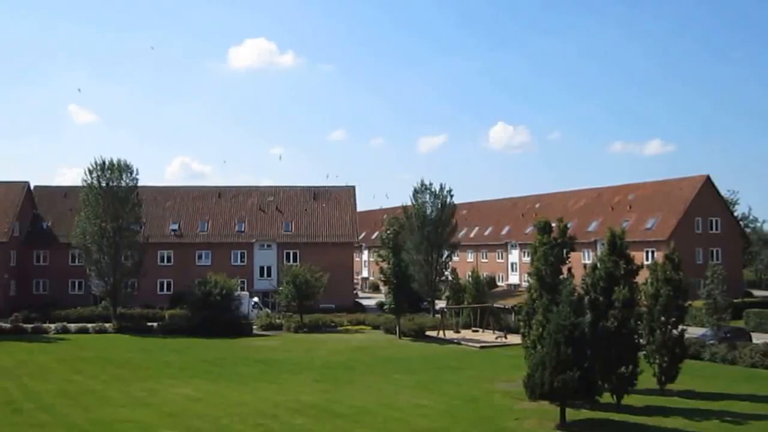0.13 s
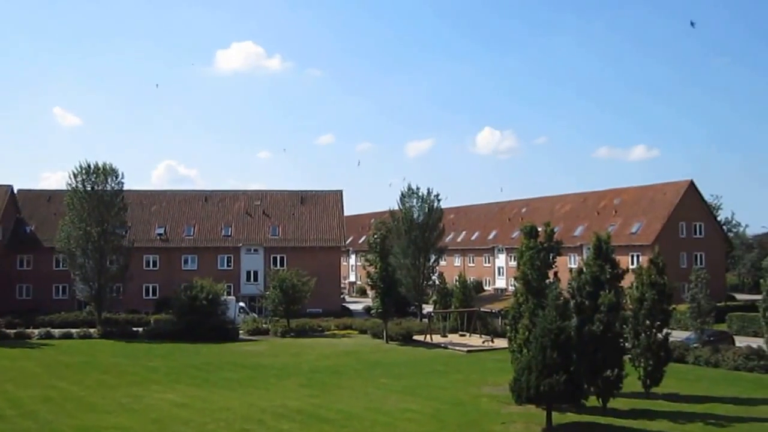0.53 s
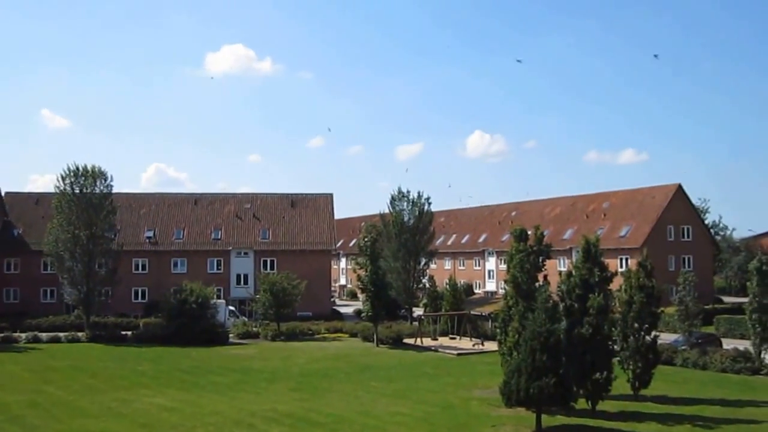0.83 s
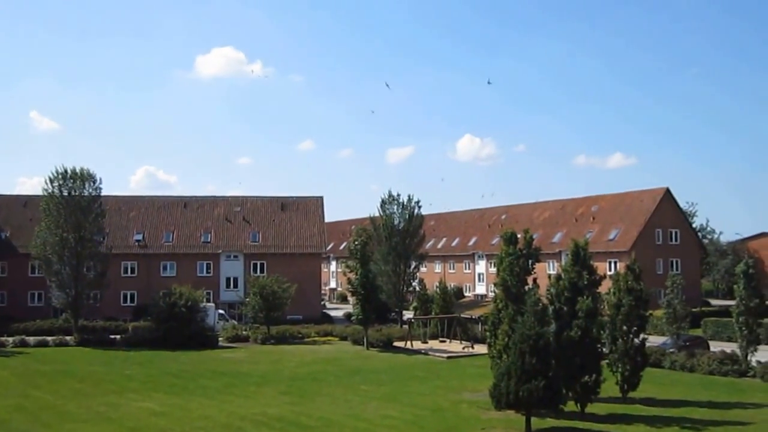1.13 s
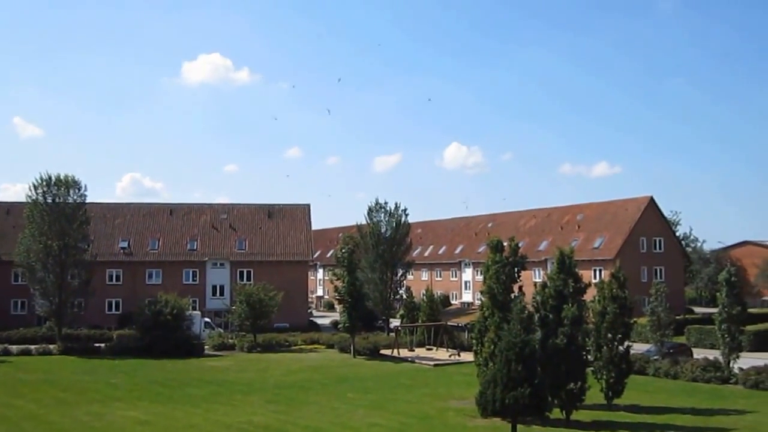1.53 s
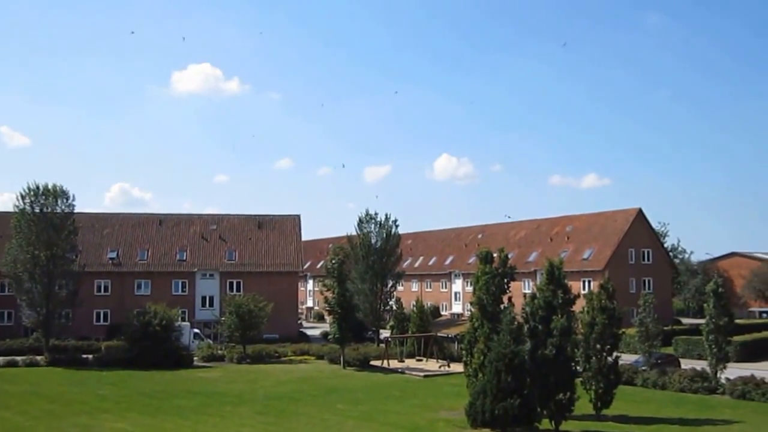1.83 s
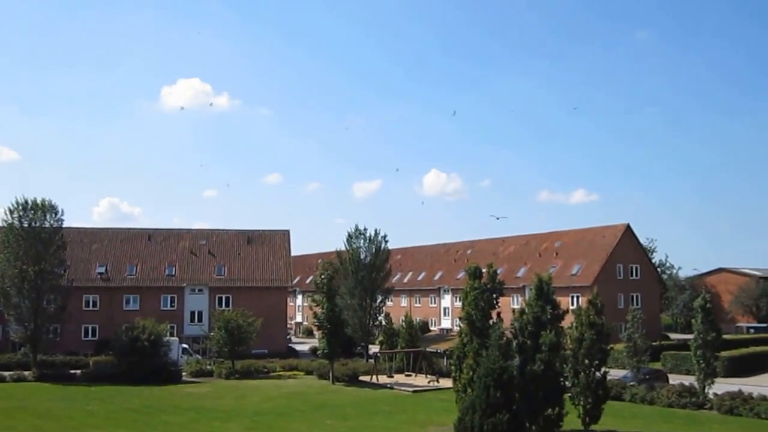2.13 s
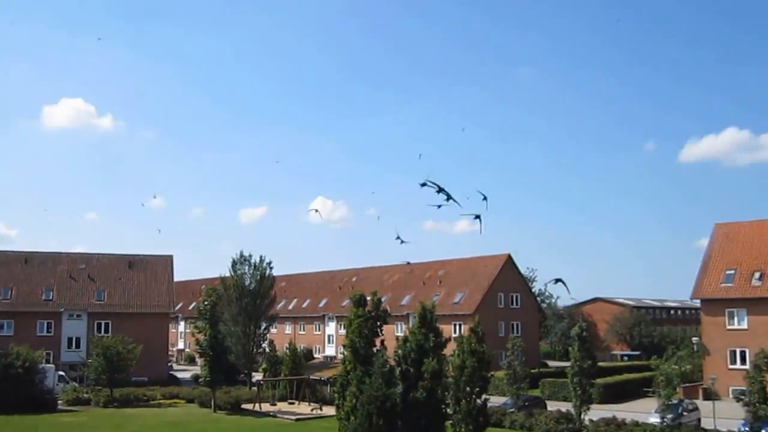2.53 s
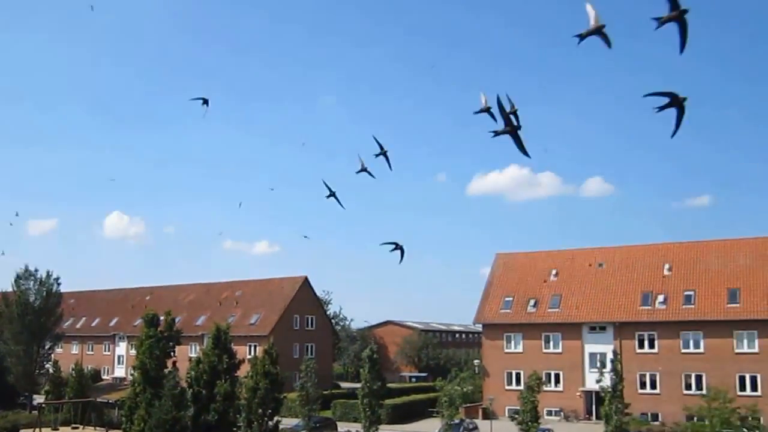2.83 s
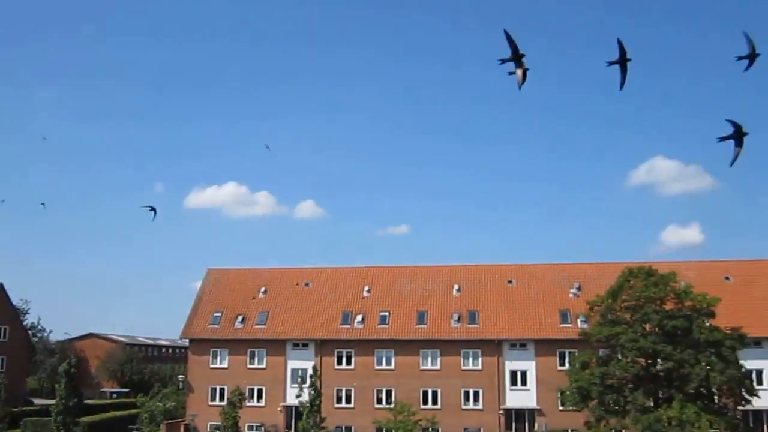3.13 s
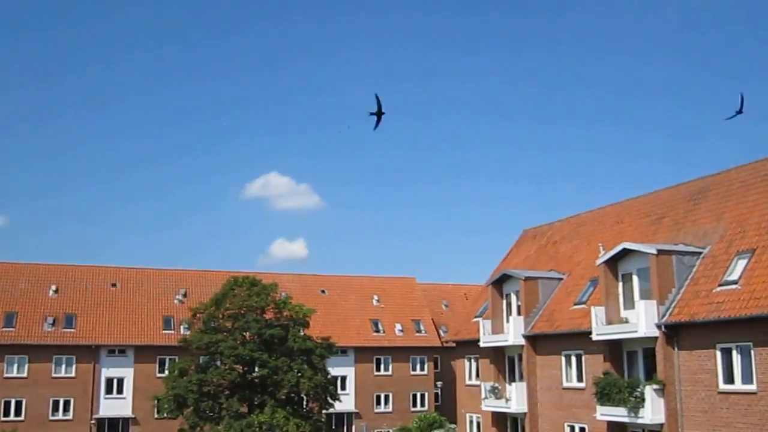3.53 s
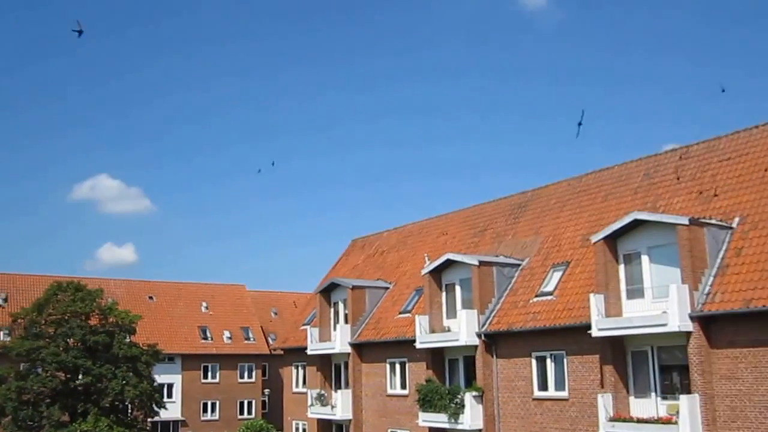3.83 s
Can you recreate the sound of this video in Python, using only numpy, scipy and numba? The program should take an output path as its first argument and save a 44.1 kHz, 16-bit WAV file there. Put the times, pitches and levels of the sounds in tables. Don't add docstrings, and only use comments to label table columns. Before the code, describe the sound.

A flock of swifts screams, thin and distant at first, then piercing as it sweeps overhead around 2.5 to 3 seconds, then fading; far traffic and wind thumps on a small outdoor camera microphone.

```python
import sys
import numpy as np
from scipy import signal
from scipy.fft import rfft, irfft
from scipy.io import wavfile
from scipy.ndimage import uniform_filter1d
from numba import njit

SR = 44100
rng = np.random.default_rng(int(sys.argv[2]) if len(sys.argv) > 2 else 0)


def makeup_ratio(level_db):
    decades = np.asarray(level_db, float) / 20
    return 10 ** decades


def materialize(psi):
    bounded = np.clip(np.atleast_2d(psi).T, -1, 1)
    quanta = np.round(bounded * 32767).astype(np.int16)
    wavfile.write(sys.argv[1], SR, quanta)


N = 176400
T = np.arange(N) / SR

# (frequency [Hz], level [dB per Hz])
TOWN_SPECTRUM = [(35, -26), (60, 7), (135, -11.5), (263, -7), (380, -13), (690, -7.5), (780, -8),
                 (1210, -5.5), (4000, -28.5), (5200, -58), (8800, -120)]
# (frequency [Hz], width [Hz], level [dB])
CAR_HUM = [
    (683, 18, -50.5),
    (1175, 79, -50),
]
# (time [s], level [dB])
GUSTS = [(.04, -51.5), (.5, -45), (.8, -35), (1.25, -24.5), (1.33, -27), (1.44, -21), (1.65, -30),
         (1.73, -38), (1.95, -25.5), (2.12, -37), (2.251, -24.5), (2.55, -31.5), (2.75, -33), (2.92, -51),
         (3.34, -36), (3.54, -37.5), (3.62, -27), (4, -32.5)]
# (time [s], peak level [dB])
WIND_THUMPS = [(0.689, -26), (1.009, -23.5), (1.16, -13.5), (1.271, -24.5), (1.408, -13), (1.436, -6.5),
               (1.479, -19), (1.53, -18), (1.645, -29), (1.763, -28.5), (1.953, -19), (2.224, -16),
               (2.27, -13), (2.379, -16), (2.749, -17), (3.61, -4), (3.649, -14), (3.696, -12.5),
               (3.714, -23), (3.783, -19), (3.801, -11.5), (3.835, -14), (3.959, -19.5), (3.997, -11.5)]
# (first chip [s], last chip [s], first pitch [Hz], gap [s], level [dB])
TRILL_RUNS = [(0.043, .075, 5880, 0.028, -41.5), (0.358, 0.49, 5900, 0.011, -40.5),
              (0.967, 1.06, 6000, 0.011, -34.5), (1.831, 1.913, 6050, 0.015, -23),
              (2.232, 2.32, 5630, 0.014, -25), (2.403, 2.475, 6470, 0.012, -19),
              (2.763, 2.86, 6200, 0.026, -15.5), (2.783, 2.86, 4540, 0.029, -25),
              (3.2, 3.015, 5950, .025, -18.5), (3.18, 3.234, 5060, 0.011, -29.5),
              (3.1, 4, 5880, 0.013, -30.5), (3.789, 3.865, 3870, .014, -41.5),
              (2.478, 2.504, 4500, 0.014, -33.5), (3.046, 3.087, 4270, .037, -30),
              (2.336, 2.34, 4440, 0.019, -30), (0.451, 0.452, 5070, 0.028, -39),
              (3.647, 3.68, 4200, 0.013, -39.5), (3.394, 3.455, 4050, 0.033, -40),
              (3.146, 3.147, 4700, .02, -36), (2.96, 2.961, 4400, .02, -35), (0.67, .82, 5700, 0.029, -38),
              (1.865, 1.935, 4900, 0.013, -39), (3.755, 3.78, 4700, 0.019, -38),
              (3.967, 3.968, 3900, .02, -41), (1.487, 1.5, 4900, 0.014, -36), (2.79, 2.86, 5300, .021, -29),
              (2.63, 2.631, 4400, .012, -36), (2.29, 2.37, 4900, .016, -33)]
# (start [s], length [s], pitch after swoop [Hz], end pitch [Hz], level [dB])
FAR_SCREAMS = [(.03, .114, 6600, 5700, -55), (1.08, .1, 5450, 5250, -38), (1.2, .25, 5200, 5500, -39),
               (.67, .173, 5500, 5600, -42.5), (1.8, .167, 5600, 5100, -40), (3.47, .2, 6300, 6450, -35),
               (3.47, .2, 5300, 5350, -37), (3.78, .252, 5250, 5250, -37.5), (2, .34, 5350, 5450, -36),
               (3.25, .1, 5700, 5800, -34)]
LEVEL_SCREAMS = [
    (.475, .22, 5150, 5350, -37.5),
]
FLAT_SCREAMS = [
    (3.322, .02, 6350, 6550, -26.5),
    (3.363, .13, 5900, 6300, -27.5),
    (.455, .012, 5850, 6000, -41),
]
TORN_SCREAMS = [
    (3.078, .2, 5490, 5797, -24),
    (3.362, .2, 5160, 5694, -29.5),
]
CLEAR_SCREAMS = [(.955, .15, 5150, 5330, -37), (1.16, .32, 5900, 6230, -31.5),
                 (1.895, 0.33, 6300, 5900, -22), (2.175, .22, 5700, 6600, -18.5),
                 (2.815, .25, 6050, 6380, -15.5), (3.04, 0.12, 5350, 5700, -22),
                 (1.51, .31, 5400, 6150, -28), (0.46, .03, 5300, 5500, -44), (1.94, .26, 5350, 5900, -29),
                 (2.415, .02, 5300, 5500, -37), (1.885, .03, 4600, 4700, -41.5),
                 (3.333, 0.023, 4750, 4800, -35), (2.52, .2, 5700, 5900, -20.5),
                 (1.17, .3, 5400, 5650, -37.5)]
SPLIT_SCREAMS = [
    (.105, 0.28, 5400, 5940, -43),
    (.7, 0.23, 5270, 6074, -34),
    (1.485, .33, 5500, 6393, -24.5),
    (2.215, 0.23, 5280, 6030, -24.5),
    (2.885, .2, 5590, 5896, -21),
    (1.53, .28, 5390, 6094, -33.5),
]
HOARSE_SCREAMS = [
    (2.503, .26, 5850, 6450, -15),
    (2.485, .29, 5600, 5900, -21),
    (3.675, .34, 5053, 5805, -27.5),
    (3.72, 0.31, 5200, 6097, -31.5),
]
# (swoop depth [share], swoop time [s], half-pitch line [dB], octave [dB], roughness [0-1], buzz [0-1])
FAR_VOICE = (.03, .03, -40, -27, .5, .4)
LEVEL_VOICE = (.02, .008, -40, -22, .14, .6)
FLAT_VOICE = (.05, .01, -40, -32, .13, .45)
TORN_VOICE = (.11, .014, -15, -22, .27, .4)
CLEAR_VOICE = (.16, .013, -34, -21, .1, .4)
SPLIT_VOICE = (.15, .012, -21, -20, .12, .3)
HOARSE_VOICE = (.13, .018, -22, -27, .24, .4)


def unit(x):
    return x / np.sqrt(np.mean(x ** 2))


def band(x, hz, width):
    return signal.lfilter(*signal.iirpeak(hz, hz / width, fs=SR), x)


def low_pass(order, hz):
    return signal.lfilter(*signal.butter(order, hz, fs=SR), rng.standard_normal(N))


def walk(rate, size=N):
    k = max(int(SR / rate), 1)
    smooth = uniform_filter1d(uniform_filter1d(rng.standard_normal(size), k), k)
    return smooth * np.sqrt(1.574 * k)


def add(out, start, x):
    i = max(int(start * SR), 0)
    out[i:i + len(x)] += x[:N - i]


def noise_band(hz, width):
    return unit(band(band(rng.standard_normal(N), hz, width), hz, width))


def traffic():
    out, swell = 0, walk(4.5)
    hz_points, db_points = np.array(TOWN_SPECTRUM).T
    for hz in 60 * 2 ** np.arange(0, 6.2, .5):
        density_db = np.interp(np.log(hz), np.log(hz_points), db_points)
        db = density_db + 10 * np.log10(hz) + .26 * swell + .96 * walk(24)
        out = out + makeup_ratio(db) * noise_band(hz, hz / 2)
    return makeup_ratio(-42) * unit(out)


def passing_car():
    hum = 0
    for hz, width, db in CAR_HUM:
        hum = hum + makeup_ratio(db + 2 * walk(27)) * unit(band(rng.standard_normal(N), hz, width))
    fade_s = .79
    return hum / (1 + (T / fade_s) ** 6)


def hiss():
    return makeup_ratio(-60) * low_pass(4, 5000)


def far_flock():
    return makeup_ratio(-50 + 2 * walk(36)) * noise_band(5480, 1200)


def puff(hz):
    t = T[:6000] - 3000 / SR
    cycle = -(1.15 + 5 * hz * t) / (1 + (5 * hz * t) ** 2) ** 1.29
    return cycle + .34 * np.exp(-(2 * hz * t + .42) ** 2)


def wind():
    times, levels = np.array(GUSTS).T
    puff_hz, thump_hz, half_s = 58, 141, 3000 / SR
    out = np.zeros(N)
    puffs_per_s = 60
    for u, v, w, z in rng.random((rng.binomial(500, puffs_per_s / 125), 4)):
        s = 4 * u
        db = np.interp(s, times, levels) - 4 * (np.log(v + .016) + 1)
        octaves = 2.3 * (w - .5) + .05 * (db + 32)
        sign = 1 if z < .5 else -1
        add(out, s - half_s, sign * makeup_ratio(db) * puff(min(puff_hz * 2 ** octaves, thump_hz)))

    buffet_db = -2.5 + np.interp(T, times, levels) + 4.7 * walk(22.6)
    out = out + makeup_ratio(buffet_db) * unit(low_pass(2, 69.5))

    shudder, shudder_s = unit(low_pass(2, 190)), .015
    for s, db in WIND_THUMPS:
        hz = thump_hz * 2 ** (.12 * rng.standard_normal())
        add(out, s - half_s + .0019, makeup_ratio(db + 3) * puff(hz))
        out = out + makeup_ratio(db - 15.5) * np.exp(-((T - s) / shudder_s) ** 2) * shudder
    return signal.lfilter(*signal.butter(1, 25, "high", fs=SR), out)


def whistle(phase, half_db, octave_db, pulse):
    low_line = makeup_ratio(-16) * np.sin(phase / 2)
    half_lines = np.sin(1.488 * phase) + .12 * np.sin(2.54 * phase) + low_line
    octave = makeup_ratio(octave_db) * pulse ** 2 * np.sin(2 * phase)
    return pulse * (np.sin(phase) + makeup_ratio(half_db) * half_lines) + octave


def trills():
    out, t = np.zeros(N), T[:600] - 300 / SR
    for first, last, hz, gap, db in TRILL_RUNS:
        for s in np.arange(first, last + .002, max(gap, .01))[:12]:
            loud, shift, size = rng.standard_normal(3)
            wide = .0014 * (1 + .17 * size) * (gap / .0096) ** .37
            sag = 1 - .6 * (s - first)
            pitch = hz * sag * (1 - .12 * np.tanh(t / wide / 2))
            phase = 2 * np.pi * np.cumsum(pitch) / SR
            x = whistle(phase, -26 + 4 * shift, -22, np.exp(-(t / wide) ** 2))
            click = band(rng.standard_normal(600), hz, 3900)
            x = x + makeup_ratio(-12) * np.exp(-(2 * t / wide + 1) ** 2) * click
            upper = np.sin(1.164 * phase)
            x = x + makeup_ratio(-18.5 + 4 * size) * np.exp(-(1.4 * t / wide) ** 2) * upper
            add(out, s + t[0] + .001 * shift, makeup_ratio(db + 3 + 3 * np.tanh(loud)) * x)
    return out


def screams(rows, voice):
    out = np.zeros(N)
    depth, swoop, half_db, octave_db, fresh, buzz = voice
    attack_s, release_s, longest = .004, .04, SR // 2
    for start, length, hz, end_hz, db in rows:
        t = T[:min(int((length + release_s) * SR), longest)]
        n = len(t)
        wander, jolt, shake, drift = (walk(r, longest)[:n] for r in (55, 750, 206, 24.1))
        air = rng.standard_normal(n)
        share = t / t[-1]
        grown = np.clip(t / (2 * swoop), 0, 1)
        rough = np.minimum(fresh * (.595 + 1.62 * share ** 2), .55)

        buzz_hz = 262 * (1 + .3 * rough * wander + .015 * drift + .03 * air[0])
        beat = 2 * np.pi * np.cumsum(buzz_hz) / SR

        glide = hz + (end_hz - hz) * np.sin(np.pi / 2 * np.clip(share / .6, 0, 1))
        bend = 1 - depth * np.exp(-t / swoop) - .045 * share ** 4
        pitch = glide * (bend + .003 * drift + .002 * wander)
        pitch = pitch + grown * (105 * np.cos(beat) + 500 * rough * np.tanh(jolt))
        phase = 2 * np.pi * np.cumsum(pitch) / SR

        flutter_db = 10 * rough * np.tanh(shake) + .8 * drift + 1.5 * wander
        pulse = (1 + grown * buzz * np.cos(beat - 1.9)) * makeup_ratio(flutter_db)
        env = np.clip(t / attack_s, 0, 1) * (.36 + .64 * grown)
        env = env * np.clip((t[-1] - t) / release_s, 0, 1)
        env = env * makeup_ratio(2 * (np.sin(np.pi * share) - 1))

        line_db = half_db + 2 * drift + 2 * np.tanh(wander) + 2 * np.tanh(shake)
        line_db = line_db - 38 * share ** 3 - 12 * np.exp(-t / swoop)
        x = whistle(phase, line_db, octave_db + .29 * (db + 19), pulse)
        breath = makeup_ratio(-24) * pulse * band(air, 6550, 6500)
        add(out, start, makeup_ratio(db + 3) * env * (x + breath))
    return out


def house_echo(birds):
    t = T[:SR]
    t60_s, start_s = .3, .01
    tail = rng.standard_normal(SR) * makeup_ratio(-60 * t / t60_s) * np.clip(t / start_s - 1, 0, 1)
    tail = signal.lfilter([1], [1, -.2], tail)
    echo = unit(signal.fftconvolve(birds, tail)[:N])
    return makeup_ratio(-10) * echo * np.sqrt(np.mean(birds ** 2))


def scene():
    background = traffic() + passing_car() + hiss() + far_flock() + wind()
    birds = trills()
    for rows, voice in [(FAR_SCREAMS, FAR_VOICE), (LEVEL_SCREAMS, LEVEL_VOICE), (FLAT_SCREAMS, FLAT_VOICE),
                        (TORN_SCREAMS, TORN_VOICE), (CLEAR_SCREAMS, CLEAR_VOICE),
                        (SPLIT_SCREAMS, SPLIT_VOICE), (HOARSE_SCREAMS, HOARSE_VOICE)]:
        birds = birds + screams(rows, voice)
    return (background + birds + house_echo(birds))[None]


@njit
def follow(x, up, down):
    e, y = 0., np.empty(len(x))
    for i in range(len(x)):
        e += (abs(x[i]) - e) * (up if abs(x[i]) > e else down)
        y[i] = e
    return y


def top_cut(x):
    return signal.sosfilt(signal.butter(12, 15800, fs=SR, output="sos"), x)


def record(dry):
    hz = np.fft.rfftfreq(N, 1 / SR)
    top_hz, stop_db = 14100, 12
    dry = irfft(rfft(dry) * makeup_ratio(-stop_db / (1 + np.exp((top_hz - hz) / 150))), N)
    attack_s, release_s, threshold_db, ratio = .11, .14, -20.5, 4.5
    level = follow(dry[0], 1 / (attack_s * SR), 1 / (release_s * SR))
    gain = np.minimum(makeup_ratio(threshold_db) / (level + 1e-9), 1) ** (1 - 1 / ratio)
    mix = np.clip(dry * gain, -1, 1) * (T > .0365)
    return top_cut(mix)


dry = scene()
out = record(dry)
materialize(out)
```